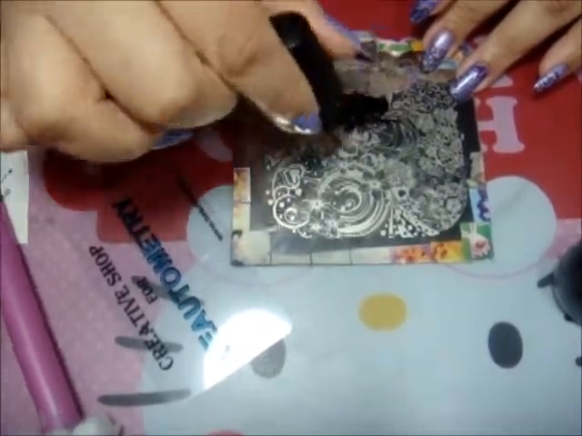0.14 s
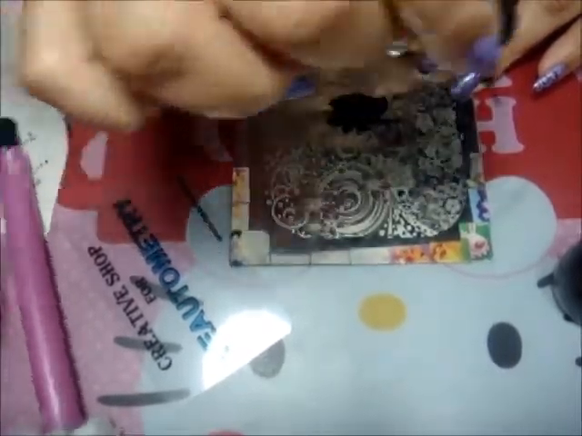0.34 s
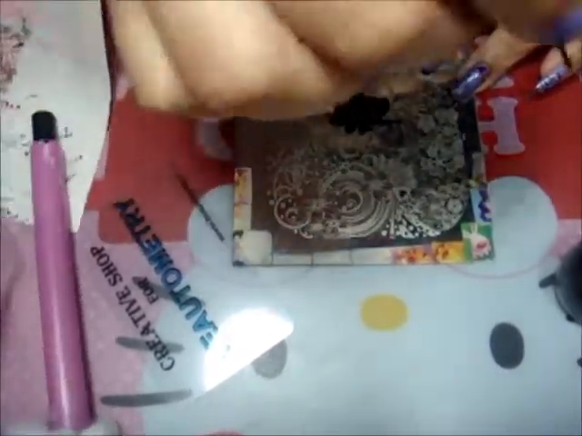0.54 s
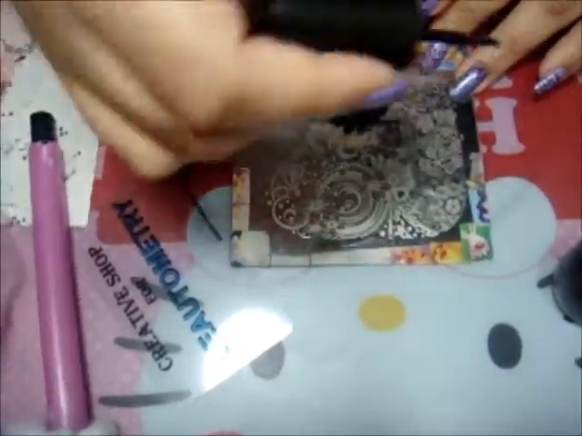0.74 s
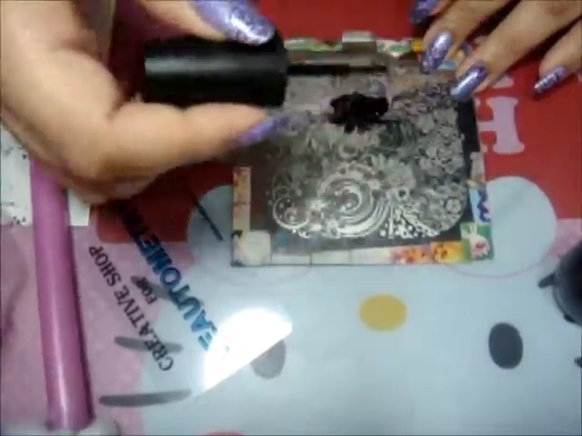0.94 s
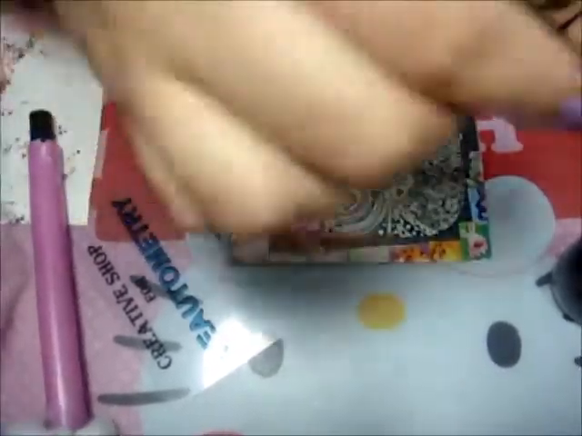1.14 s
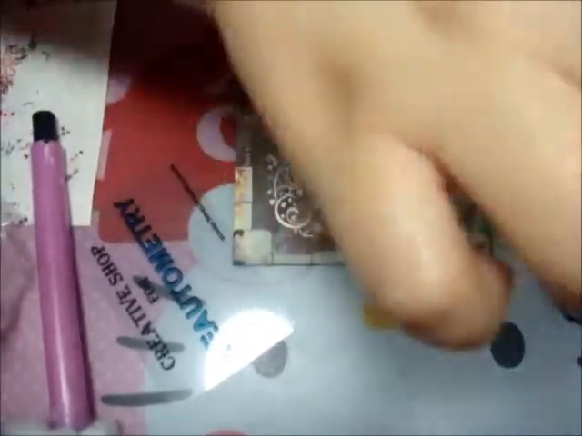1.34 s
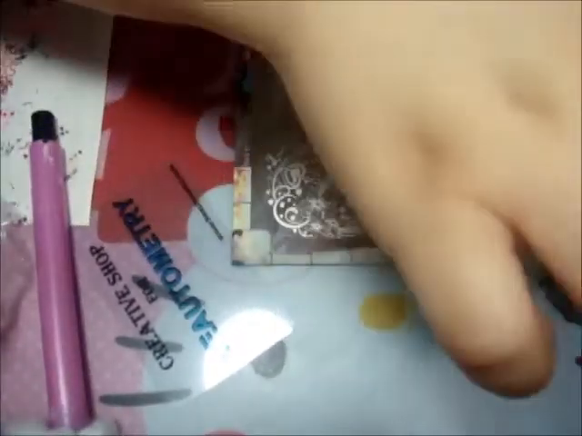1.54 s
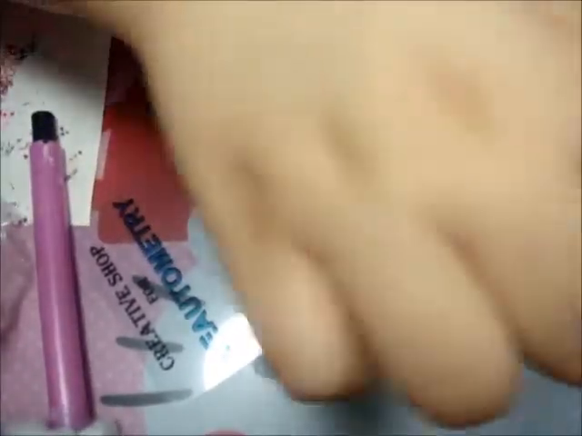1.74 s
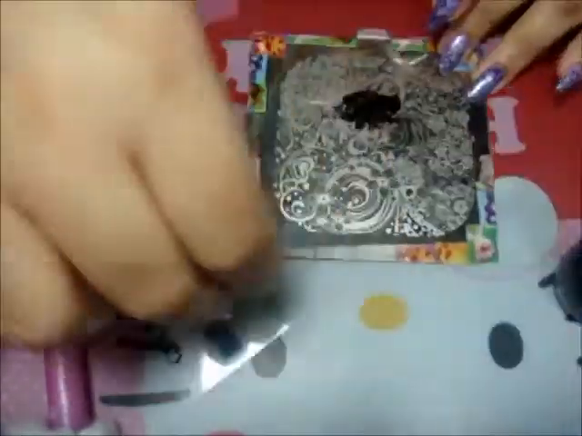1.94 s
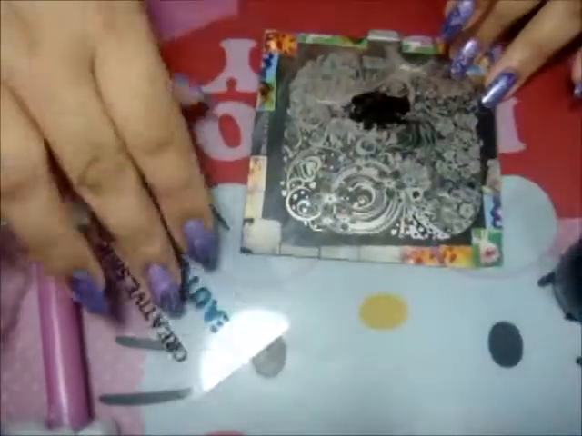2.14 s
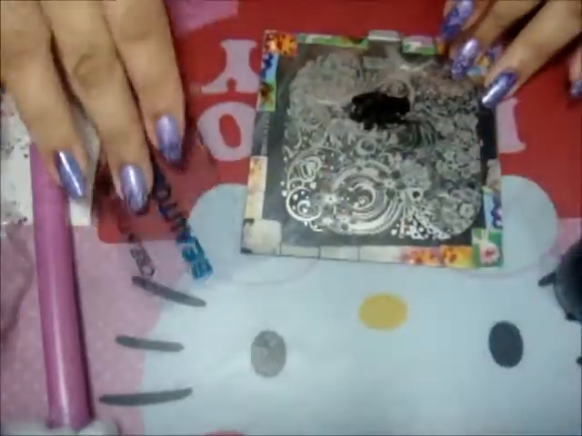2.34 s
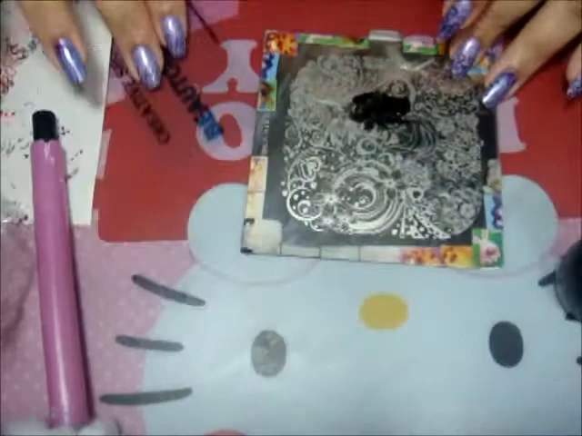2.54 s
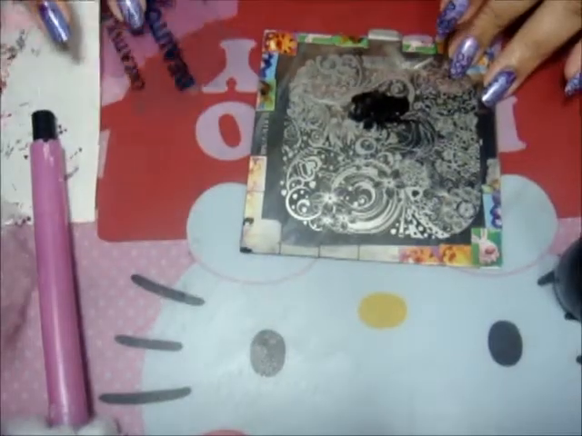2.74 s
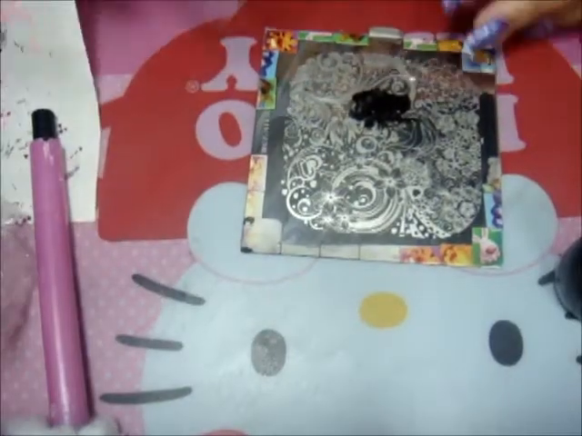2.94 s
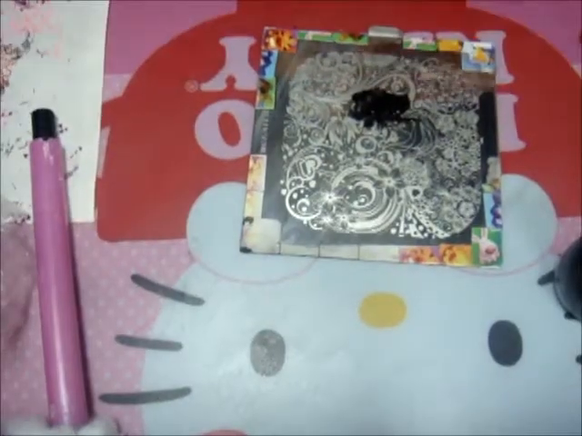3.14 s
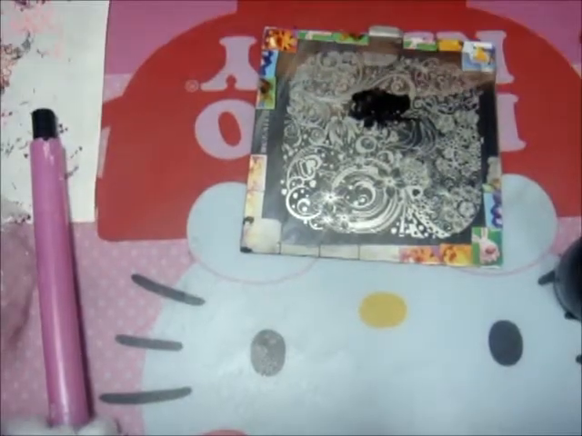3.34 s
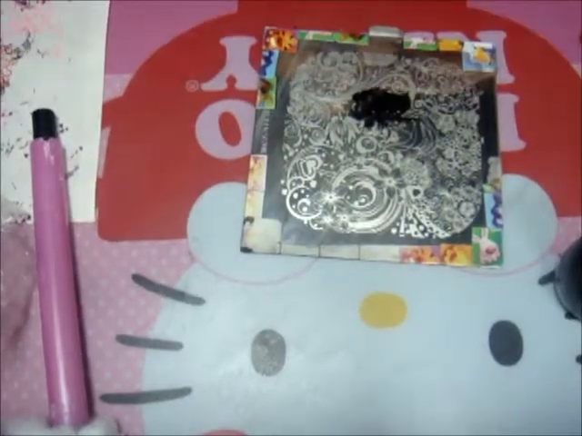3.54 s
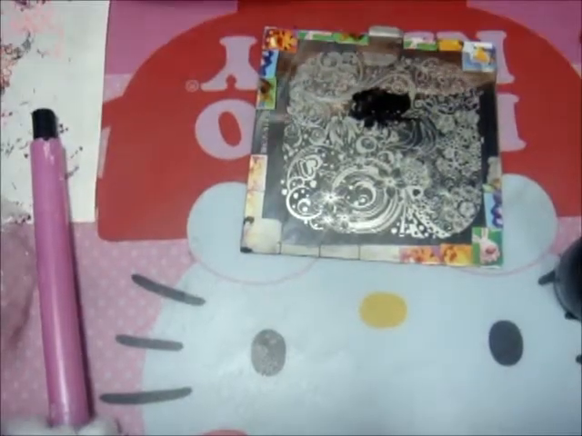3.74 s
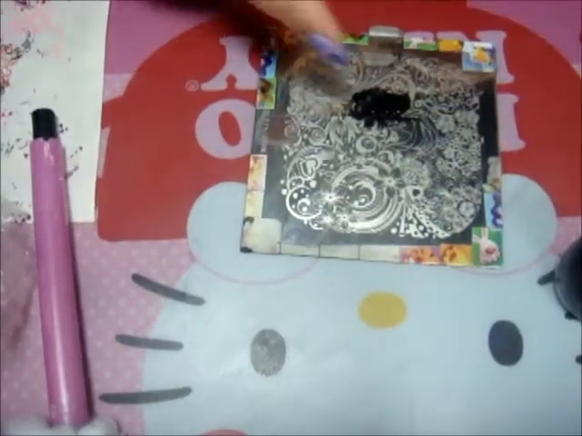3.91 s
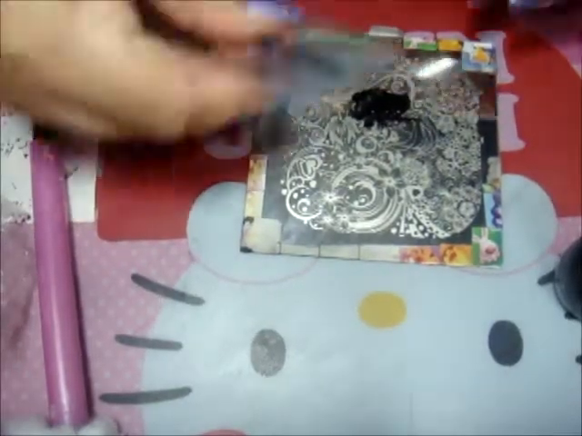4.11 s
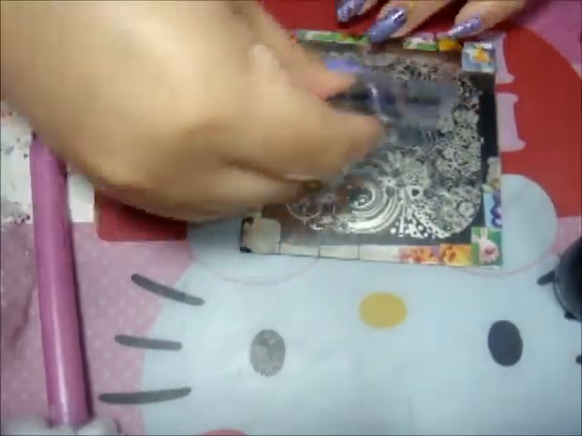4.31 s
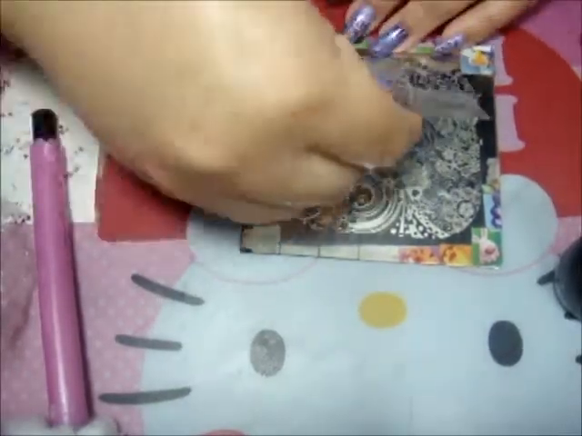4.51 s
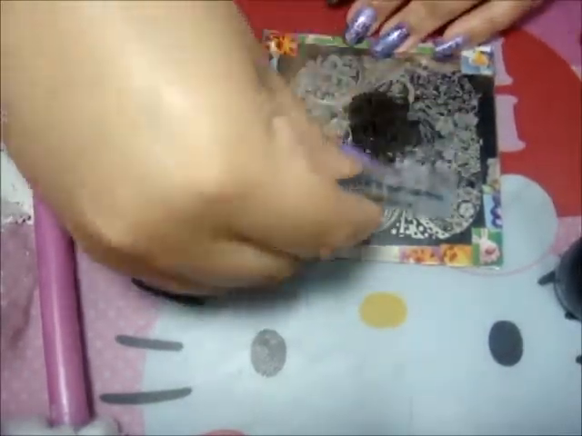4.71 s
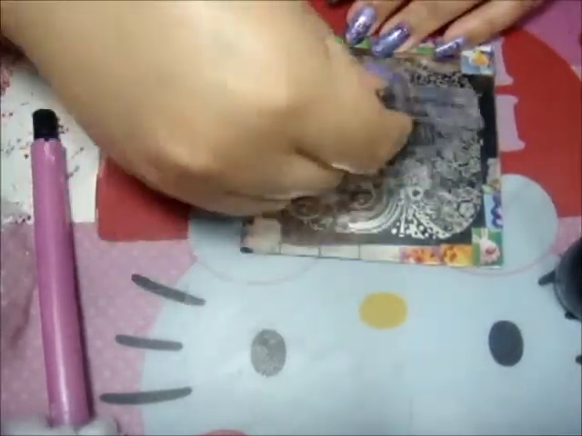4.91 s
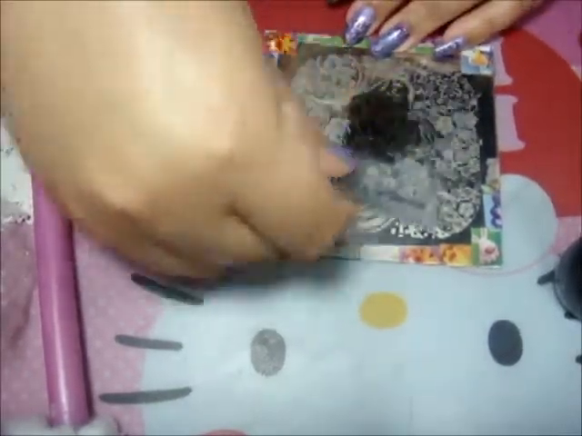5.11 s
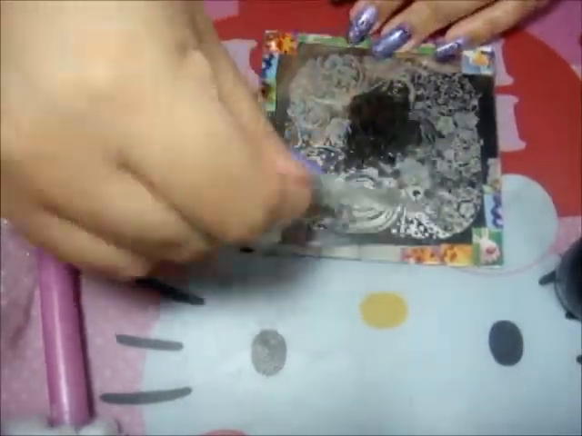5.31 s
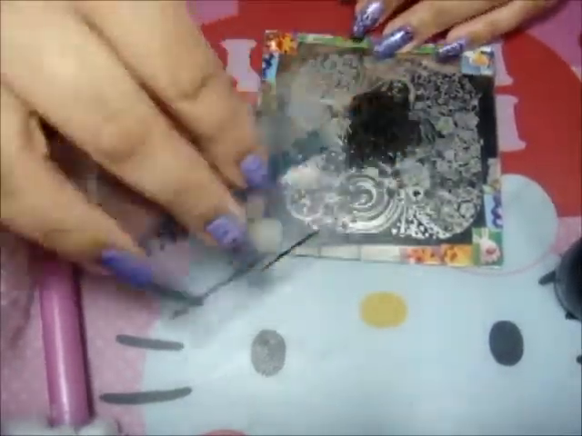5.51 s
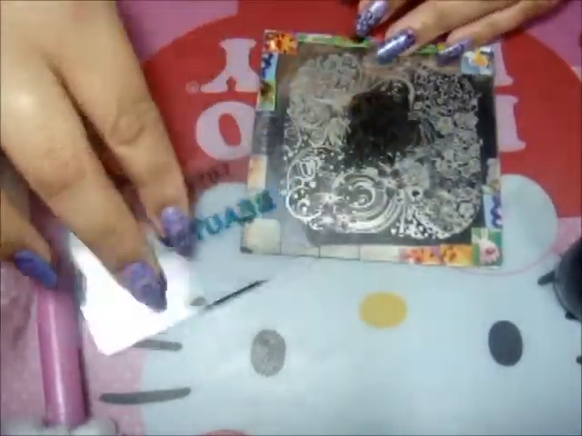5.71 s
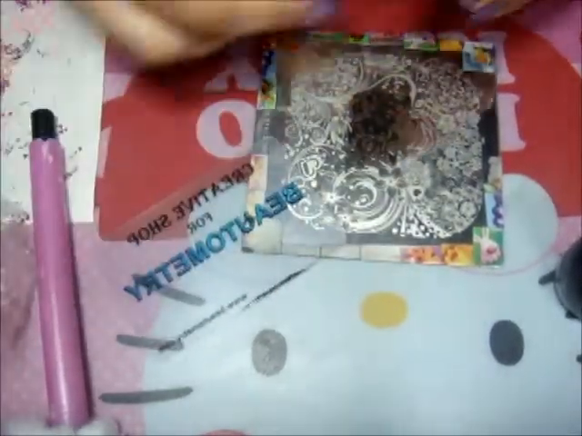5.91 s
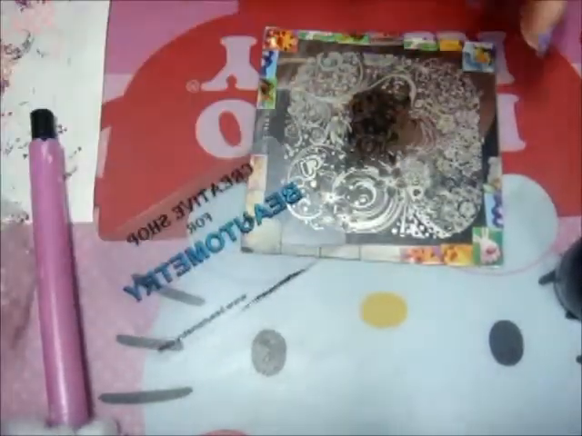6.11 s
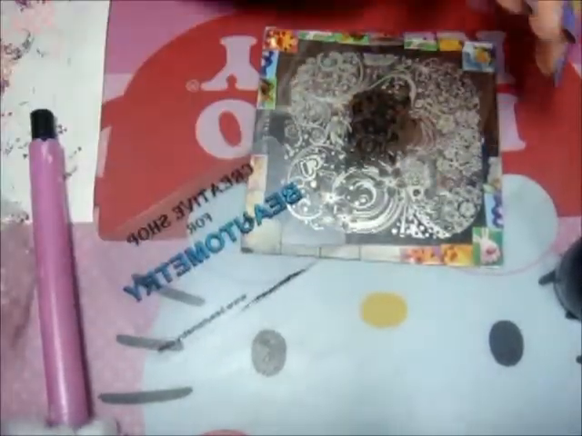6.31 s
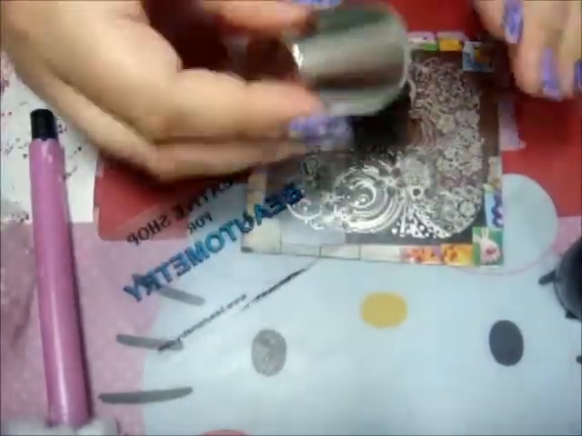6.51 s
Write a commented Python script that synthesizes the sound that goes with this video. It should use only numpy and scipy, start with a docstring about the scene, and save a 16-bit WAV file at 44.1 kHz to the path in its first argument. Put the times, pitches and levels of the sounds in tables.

```python
"""Hands at a table in a quiet room, heard close, over air, hiss, a wavering hum and faint whistles.
First a polish brush ticks on an etched metal plate, and its bottle knocks the table at 1.6 s: short rattles
and soft blows ring modes. From 2.2 s a thin plastic card slides long over the mat: a dense hail of impacts.
From 3.5 s its edge taps, then scrapes the plate at 4.5, 5.0 and, briefly, 5.6 s, catching on the etching
in the first two strokes. A last tap rings the metal at 5.8 s; a small slide follows, then the room remains."""
import sys
import numpy as np
from scipy import signal
from scipy.fft import rfft, irfft, next_fast_len
from scipy.io import wavfile
from scipy.ndimage import uniform_filter1d

SR = 44100
rng = np.random.default_rng(int(sys.argv[2]) if len(sys.argv) > 2 else 0)


def file_out(sig):
    """Save sig as 16-bit WAV at sys.argv[1]."""
    # one column per channel
    cols = np.atleast_2d(sig).T
    # limit, then scale
    lim = np.clip(cols, -1, 1)
    pcm = np.round(lim * 32767).astype(np.int16)
    wavfile.write(sys.argv[1], SR, pcm)


N = 289340  # samples

# In the tables of contacts and friction, shares are relative to the middle band or to the object's own ring.
# Brush and nail ticks:
# (time [s], level [dB], strongest tone [Hz], treble share [dB], rattle t60 [s])
BRUSH_TICKS = [(0.0263, -35.5, 1800, -4, 0.069), (0.0679, -24.5, 5480, -0.5, 0.035),
               (0.1782, -43, 4070, 4.5, 0.016), (0.21, -52, 2050, 16, 0.011), (0.278, -37, 2100, 8, 0.012),
               (0.3053, -27.5, 3970, 3.5, .051), (0.3562, -33, 3660, 8.5, 0.027),
               (0.4106, -30.5, 2360, -28, 0.066), (0.4183, -16.5, 3940, -3.5, 0.022),
               (0.5931, -33.5, 1840, -6, 0.036), (0.6419, -28.5, 3440, 8, 0.025),
               (0.7154, -33, 3280, -2, 0.022), (0.749, -38, 4290, 0.5, .026),
               (0.804, -30, 3000, 2.5, 0.038), (0.9441, -33, 2770, 5, 0.045),
               (1.1208, -31, 4060, 4.5, 0.032), (1.3556, -39, 1850, 1.5, 0.042),
               (1.4048, -28, 4260, 7, 0.031), (1.612, -18, 4120, -11, 0.019),
               (1.7166, -28.5, 3250, 3.5, .033), (1.9116, -37, 3270, 1.5, 0.046),
               (1.9709, -33, 4240, 2, 0.036), (2.0776, -37, 3080, -3, 0.078),
               (2.835, -32.5, 2070, 4.5, 0.064)]
# Dull blows of the bottle on the table: (time [s], level [dB])
BOTTLE_KNOCKS = [(1.606, -25), (1.613, -17.5), (1.625, -27), (1.64, -19), (1.644, -25), (1.65, -24),
                 (1.654, -26), (1.668, -38)]
# The long slide of the card over the mat:
# (time [s], level [dB], treble share [dB], low share [dB])
LONG_SLIDE_PATH = [(2.165, -79, -7, 8), (2.173, -49, -27, -24), (2.189, -47, 4.5, -8.5),
                   (2.283, -37, 2, -11.5), (2.353, -31.5, -6, -12), (2.375, -36.5, -1.5, -12.5),
                   (2.427, -32.5, -1.5, -13), (2.605, -36.5, -8, -17), (2.63, -44.5, -3, -23)]
# Short slides over the mat:
# (start [s], length [s], crest place [share of length, 0-1], crest level [dB], treble share [dB])
SHORT_SLIDES = [(0.18, 0.16, 1, -55, -20), (0.289, 0.11, 1, -46, 1.5), (0.406, 0.07, 0.57, -51.5, -4.5),
                (0.569, 0.11, 0.8, -51.5, -29), (1.897, 0.079, 0.53, -42.5, -7.5),
                (2.612, 0.11, 0.67, -47, -2.5), (2.751, 0.065, 0.95, -48.5, -10),
                (2.808, 0.05, .7, -41.5, -2.5), (2.865, 0.085, 0.74, -49, -2), (2.955, 0.34, 0.16, -62, -6),
                (3.572, 0.055, .4, -57.5, -1.5), (5.282, 0.15, 0.94, -61.5, 0),
                (6.092, 0.23, 0.4, -70.5, 10)]
# The card is handled and its edge taps the plate or mat:
# (time [s], level [dB], strongest tone [Hz], treble share [dB], rattle t60 [s], low share [dB])
CARD_TAPS = [(3.5467, -25.5, 2680, -4.5, 0.019, -19), (3.667, -41.5, 2680, 2.5, .021, -12),
             (3.8803, -28.5, 3020, -4, 0.019, -8), (3.91, -39, 1690, -6, 0.023, -4),
             (3.9485, -38, 2860, 7, 0.032, -11), (3.9622, -31.5, 1580, -29, 0.011, -12),
             (4.2003, -27, 2430, -3.5, 0.022, -19), (4.2496, -39.5, 2860, -4, 0.035, -25),
             (4.4548, -19, 2600, -7.5, 0.014, -8.5), (4.5097, -35.5, 2880, -26, 0.018, -16),
             (4.9497, -24, 2950, -14, 0.019, -10.5), (4.9861, -24.5, 3100, -10, 0.02, -31),
             (4.9905, -24, 2980, -10, 0.017, -12.5), (5.011, -42, 2500, -27, 0.011, -3),
             (5.1607, -30, 4370, -18, 0.0057, -24), (5.1746, -38.5, 1770, 7, 0.012, -10),
             (5.341, -40, 5100, 5, 0.014, -11), (5.5671, -22.5, 2100, -9, 0.028, -15),
             (5.6037, -35, 2500, -11, 0.05, -28), (5.6415, -28, 2800, -7, .025, -21),
             (5.6455, -14.5, 2720, -17, 0.018, -17), (5.656, -22.5, 2780, -26, 0.016, -18),
             (5.7205, -20.5, 2840, -0.5, 0.021, -19), (5.752, -32.5, 2130, -2, .017, -14),
             (5.7806, -24.5, 3020, 0, 0.041, -17), (5.7896, -20, 4200, -3.5, 0.025, -19)]
# Strokes over the plate, one table each:
# (time [s], level [dB], treble share [dB], low share [dB])
PLATE_STROKES = [
    [(4.5, -53, -17, -6), (4.545, -53, -3, 2.5), (4.553, -33, -10.5, -15), (4.6, -34, -8, -11),
     (4.635, -46.5, -3, -12), (4.685, -47.5, -22, 6.5), (4.7, -81, -14, -5)],
    [(5.012, -53, -17, -5), (5.024, -41.5, -22, -10), (5.09, -40.5, -4.5, -11.5), (5.145, -41, -2, -1),
     (5.16, -62, -20, 3), (5.19, -54, -16, -4)],
    [(5.6, -49, -16, -12), (5.635, -64, -28, 4), (5.65, -31, -2, -3), (5.675, -59, -33, 7)],
]
# During a stroke the edge catches on ridges of the etching:
# (time [s], level [dB], treble share [dB], rattle t60 [s])
RIDGE_CATCHES = [(4.5496, -8.5, -21, 0.0099), (4.5561, -14.5, -11, 0.025), (4.5652, -16, -19, 0.034),
                 (4.585, -22.5, 4.5, 0.04), (4.5879, -20.5, -0.5, 0.017), (4.6118, -20, -21, 0.014),
                 (4.622, -23.5, -21, .016), (4.631, -21.5, -3.5, 0.015), (4.64, -23.5, -2.5, .012),
                 (4.6574, -32.5, 10, 0.021), (4.662, -25, 0, 0.016), (4.6763, -22, -9, .014),
                 (5.018, -19, -0.5, 0.027), (5.0234, -22.5, 2, 0.028), (5.029, -24, -13, 0.021),
                 (5.0432, -16.5, -24, 0.015), (5.0478, -21, -28, 0.018), (5.0556, -18, -1.5, 0.046),
                 (5.07, -27, 0, 0.04), (5.0834, -31, -1, 0.031), (5.1108, -27, 3, .026),
                 (5.124, -25.5, -3, 0.012), (5.1308, -27, 0, 0.027), (5.1414, -22, -6.5, 0.023),
                 (5.147, -24.5, -8, 0.018)]
# The plate is pushed and the table gives: (time [s], level [dB], time constant [s])
TABLE_PUSHES = [(4.549, -63, 0.0032), (5.02, -33, 0.00089), (5.141, -50, 0.0021)]
# The card's last tap rings the metal: (time [s], tone [Hz], level [dB], t60 [s])
LAST_TAP_PING = (5.79, 5170, -41, .14)

# Resonances of the brush: (tone [Hz], width [Hz], level [dB])
BRUSH_MODES = [(1960, 540, -2.5), (2974, 890, -1), (3660, 240, 1), (4300, 99, 1.5)]
# Resonances of the card: (tone [Hz], width [Hz], level [dB])
CARD_MODES = [(1853, 1400, -3.5), (2167, 67, 11.5), (2790, 740, 3), (3050, 294, 16.5), (3080, 700, 9),
              (4240, 970, 3.5)]
# Bright ring of the metal, before the chance of each spot: (tone [Hz], width [Hz], level [dB])
METAL_MODES = [(4700, 1400, -0.5), (6840, 880, 3), (8230, 1570, -2), (9800, 680, -5.5)]
# Low modes of the plate lying on the mat: (tone [Hz], width [Hz], level [dB])
PLATE_MODES = [(497, 157, 3), (857, 197, -0.5), (1093, 57, 5), (1510, 120, -26)]
# Low modes of the table: (tone [Hz], width [Hz], level [dB])
TABLE_MODES = [(273, 53, 4), (360, 33, 13), (419, 170, 7.5), (640, 42, 7.5), (842, 55, 5), (1040, 140, -30)]
# Relative colour of a slide over the mat: (frequency [Hz], level [dB])
MAT_COLOUR = [(290, -48), (500, -15), (574, -22.5), (959, -17.5), (1070, -12.5), (1490, -11), (1670, -9),
              (2060, 0), (2750, 1.5), (3240, -1.5), (3530, 2), (3860, -3), (4160, -0.5), (6700, -3),
              (10000, -8.5), (13000, -83.5), (22000, -120)]

# Faint whistles, perhaps a bird outdoors: (time [s], length [s], start [Hz], end [Hz], level [dB])
FAINT_WHISTLES = [(0.081, 0.067, 2660, 2540, -57), (.47, 0.086, 3150, 3150, -63),
                  (4.715, .07, 2600, 2660, -65), (4.784, 0.08, 2660, 2790, -61),
                  (5.188, 0.15, 2650, 3050, -61.5), (5.42, 0.043, 3180, 3300, -73),
                  (5.46, 0.065, 3600, 3600, -63), (5.88, .08, 3140, 3120, -64),
                  (5.918, 0.12, 2630, 2520, -60)]
# A passing low rumble: (time [s], level [dB])
RUMBLE_LEVEL = [(2.4, -88), (2.61, -60), (3.35, -69.5), (3.6, -85)]
# A low hum, before its waver: (time [s], level [dB])
HUM_LEVEL = [(0.0, -62), (0.24, -57), (0.29, -70), (0.35, -80), (0.46, -61), (0.77, -76.5), (2.41, -64),
             (4.46, -80.5), (4.64, -64), (4.73, -73), (5.04, -64.5), (6.32, -77), (6.56, -69)]
# Relative colour of the room air and microphone hiss: (frequency [Hz], level [dB])
ROOM_COLOUR = [(12, -60), (20, -14.5), (133, -5.5), (230, -1), (262, 0), (332, -2), (398, -0.5),
               (1500, -6.5), (2160, -8.5), (2590, -7.5), (3360, -10.5), (3630, -13), (10000, -18.5),
               (13000, -68), (22000, -120)]
# Course of the room air, before a fixed lift and slow drift: (time [s], level [dB])
ROOM_LEVEL = [(0.0, -59), (0.3, -55.5), (1.1, -59), (2.0, -58.5), (2.3, -56.5), (3.4, -59), (6.56, -59)]

CATCH_HZ = 2860  # the bent card's main tone
TICK_LOW_DB, CATCH_LOW_DB = -14.5, -20.5  # share of the plate's low modes
SPOT_DB = 2.0  # each contact lands on another spot and wakes the metal's modes unevenly
SET_OFF_S, STOP_S = 0.01, 0.012  # how fast friction starts and stops
STILL_DB = -42  # level at rest, relative to the slide's end levels
FIRST_DB, LAST_DB = -6.5, -6  # a short slide's start and end, relative to its crest
SLIDE_LOW_DB = -8  # a short slide's low share
LIFT_S, LIFT_LENGTH_S = 2.548, 0.064  # the card starts to lift off; how long it takes
LIFT_HZ, LIFT_SHARE = 3250, 0.88  # the slide loses this share under LIFT_HZ
HUM_HZ, HUM_WIDTH_HZ, HUM_WAVER_DB = 148.2, 13, 2.5
CUT_HZ = 10180  # the recorder's upper band limit


def amp(db):
    """Decibels to amplitude."""
    return 10 ** (np.asarray(db) / 20)


def unit(x):
    """Scales a signal to rms 1."""
    return x / np.sqrt(np.mean(x ** 2) + 1e-20)


def add(mix, s, sound):
    """Lays a sound into the mix at s seconds, cut at the end."""
    part = mix[round(s * SR):][:len(sound)]
    part += sound[:len(part)]


def noise():
    """White noise as long as the scene."""
    return rng.standard_normal(N)


def course(rows, **outside):
    """Level in decibels over the whole scene, drawn straight between (time, level) rows."""
    return np.interp(np.arange(N) / SR, *np.transpose(rows), **outside)


def ring(x, hz, width):
    """One resonance: a decaying complex pole with gain 1 at its tone."""
    r = np.exp(-np.pi * width / SR)
    return 2 * signal.lfilter([1 - r], [1, -r * np.exp(2j * np.pi * hz / SR)], x).real


def body(x, modes):
    """The sum of an object's resonances, with alternating signs."""
    return sum((-1) ** k * amp(db) * ring(x, hz, width) for k, (hz, width, db) in enumerate(modes))


def spot(modes):
    """The same modes, each louder or softer by chance."""
    chance = rng.standard_normal(len(modes))
    return [(hz, width, db + SPOT_DB * z) for (hz, width, db), z in zip(modes, chance)]


def coloured(x, points):
    """Shapes a signal by a spectrum drawn on a log-frequency axis, at rms 1."""
    hz, db = np.transpose(points)
    size = next_fast_len(len(x))
    bins_hz = np.fft.rfftfreq(size, 1 / SR)
    gain = amp(np.interp(np.log(bins_hz + 1), np.log(hz + 1), db))
    return unit(irfft(rfft(x, size) * gain, size)[:len(x)])


def mat_colour(x):
    """The colour of friction on the mat."""
    return coloured(x, MAT_COLOUR)


def wobble(size, s):
    """Slow chance of rms 1 that changes within about s seconds."""
    span = max(int(s * SR), 2)
    return unit(uniform_filter1d(uniform_filter1d(rng.standard_normal(size), span), span))


def taps(rows, modes, rise, tone_db, width, click_db):
    """A short rattle rings the object, the metal and the plate; a click joins in the first two."""
    out, t = np.zeros(N), np.arange(3000) / SR
    crest = int(rise * SR)
    for s, db, hz, treble_db, t60, low_db in rows:
        swell = np.minimum(t / rise, 1) ** 2
        decay = amp(-60 * np.maximum(t - rise, 0) / max(t60, 0.004))
        rattle, metal_rattle, plate_rattle = rng.standard_normal((3, len(t))) * swell * decay
        rattle[crest] += amp(click_db)  # the edge lets go at the crest of the swell
        metal_rattle[crest] += amp(click_db - 10)
        middle = unit(body(rattle, modes)) + amp(tone_db) * unit(ring(rattle, hz, width))
        treble = body(metal_rattle, spot(METAL_MODES))
        low = body(plate_rattle, PLATE_MODES)
        for part, share_db in ((middle, 0), (treble, treble_db), (low, low_db)):
            peak = np.abs(signal.hilbert(part)).max()
            add(out, s - rise / 2, amp(db + share_db) * part / peak)
    return out


def brush_ticks():
    """The brush and nails rattle on the plate for an instant and ring the brush's modes."""
    rows = [(*row, TICK_LOW_DB) for row in BRUSH_TICKS]
    return taps(rows, BRUSH_MODES, rise=0.0018, tone_db=0.0, width=290, click_db=10)


def bottle_knocks():
    """Soft blows of about a millisecond push the table and ring its low modes."""
    out, t = np.zeros(N), np.arange(2500) / SR
    centre_s = 0.002
    blow = np.exp(-0.5 * ((t - centre_s) / 0.00024) ** 2)
    ringing = body(np.gradient(blow), TABLE_MODES)
    push = blow - uniform_filter1d(blow, size=88)
    thud = 0.56 * ringing / abs(ringing).max() - 0.42 * push
    for s, db in BOTTLE_KNOCKS:
        add(out, s - centre_s, amp(db) * thud)
    return out


def rubs(tables, colour, grit_db, per_s, clump_db, patchy_db):
    """Friction: a dense hail of tiny impacts of uneven size, its colour shifting in random patches."""
    out = np.zeros(N)
    for rows in tables:
        s, db, treble_db, low_db = np.transpose(rows)
        t = np.arange(s[0], s[-1], 1 / SR)
        size = amp(grit_db * np.minimum(rng.exponential(1, len(t)), 4))
        impacts = size * (rng.random(len(t)) < per_s / SR)
        hail = rng.standard_normal(len(t)) * (0.18 + impacts)  # a fine hiss lies under the impacts
        clumped = hail * amp(clump_db * wobble(len(t), 0.0023))
        z = signal.stft(colour(clumped), nperseg=256, noverlap=192)[2]
        patches = uniform_filter1d(rng.standard_normal(z.shape), 4, 0)  # across frequency
        patches = unit(uniform_filter1d(patches, 6, 1))  # across time
        patchy = signal.istft(z * amp(patchy_db * patches), nperseg=256, noverlap=192)[1][:len(t)]
        sound = 0
        bands = (((500, 1800), low_db), ((1800, 5000), 0 * db), ((5000, 12000), treble_db))  # Hz, dB
        for band, share_db in bands:
            sos = signal.butter(3, band, "band", fs=SR, output="sos")
            part = unit(signal.sosfiltfilt(sos, patchy))
            sound = sound + part * amp(np.interp(t, s, db + share_db))
        fade = signal.windows.tukey(len(t), min(0.013 / (s[-1] - s[0]), 1))
        add(out, s[0], sound * fade)
    return out


def long_slide():
    """A smooth, dense slide that thins from below as the card lifts off the mat."""
    x = rubs([LONG_SLIDE_PATH], mat_colour, grit_db=-0.3, per_s=30000, clump_db=0.6, patchy_db=2.0)
    low = signal.sosfiltfilt(signal.butter(3, LIFT_HZ, fs=SR, output="sos"), x)
    lift = np.clip((np.arange(N) / SR - LIFT_S) / LIFT_LENGTH_S, 0, 1)
    return x - low * LIFT_SHARE * lift


def gesture(start, length, crest, db, treble_db):
    """One slide: sets off, swells to its crest, slows and stops."""
    crest_s = np.clip(crest * length, 1.2 * SET_OFF_S, length - 0.001)
    s = start + np.array([0, SET_OFF_S, crest_s, length, length + STOP_S])
    level = db + np.array([FIRST_DB + STILL_DB, FIRST_DB, 0, LAST_DB, LAST_DB + STILL_DB])
    return np.transpose([s, level, treble_db + 0 * s, SLIDE_LOW_DB + 0 * s])


def short_slides():
    """Brief friction on the mat, with sparser and more uneven impacts than the long slide."""
    paths = [gesture(*row) for row in SHORT_SLIDES]
    return rubs(paths, mat_colour, grit_db=3.5, per_s=7600, clump_db=-0.2, patchy_db=2.0)


def card_taps():
    """The card's edge rattles and clicks on the plate or mat and rings the card's modes."""
    return taps(CARD_TAPS, CARD_MODES, rise=0.0019, tone_db=4.5, width=290, click_db=16)


def stroke_colour(x):
    """The card's resonances with a little of the mat's colour."""
    return unit(body(x, CARD_MODES)) + 0.29 * mat_colour(x)


def plate_strokes():
    """The card scrapes the plate: sparse, uneven impacts in clumps; the colour shifts in random patches."""
    return rubs(PLATE_STROKES, stroke_colour, grit_db=4.0, per_s=3000, clump_db=1.5, patchy_db=4.5)


def ridge_catches():
    """The card's edge catches on ridges of the etching and rings at the bent card's main tone."""
    rows = [(s, db, CATCH_HZ, treble_db, t60, CATCH_LOW_DB) for s, db, treble_db, t60 in RIDGE_CATCHES]
    return taps(rows, CARD_MODES, rise=0.0019, tone_db=13.0, width=320, click_db=9)


def table_pushes():
    """A slow bump with no ring, which swings through zero once as it dies."""
    out = np.zeros(N)
    for s, db, time_constant in TABLE_PUSHES:
        u = np.arange(4000) / SR / time_constant
        add(out, s, amp(db) * u * (2 - u) * np.exp(-u) * 2)
    return out


def last_tap_ping():
    """A close group of thin metal modes beats and dies away."""
    out, t = np.zeros(N), np.arange(8000) / SR
    s, hz, db, t60 = LAST_TAP_PING
    beat = 0.6 + 0.4 * np.cos(2 * np.pi * 27 * t)
    add(out, s, amp(db - 60 * t / t60) * np.sin(2 * np.pi * hz * t) * beat)
    return out


def faint_whistles():
    """Thin gliding tones, their pitch and level wavering at random."""
    out = np.zeros(N)
    for s, length, start_hz, end_hz, db in FAINT_WHISTLES:
        glide = np.linspace(start_hz, end_hz, int(length * SR))
        size = len(glide)
        hz = glide * (1 + 0.0099 * wobble(size, 0.0048))
        tone = np.sin(2 * np.pi * np.cumsum(hz) / SR)
        flutter = 1 + 0.5 * wobble(size, 0.006)
        add(out, s, amp(db) * flutter * tone * signal.windows.tukey(size, 0.5))
    return out


def rumble():
    """Noise through a broad low resonance, twice, that swells and passes."""
    tone = unit(ring(ring(noise(), 275, 120), 275, 120))
    return tone * amp(course(RUMBLE_LEVEL, left=-120, right=-120))


def hum():
    """Noise through a narrow low resonance, twice, with a wavering level."""
    tone = unit(ring(ring(noise(), HUM_HZ, HUM_WIDTH_HZ), HUM_HZ, HUM_WIDTH_HZ))
    return tone * amp(course(HUM_LEVEL) + HUM_WAVER_DB * wobble(N, 0.16))


def room_air():
    """Steady air and microphone hiss: coloured noise, drifting a little."""
    lift_db, drift_db = 3, 0.9
    level = lift_db + course(ROOM_LEVEL) + drift_db * wobble(N, 0.04)
    return coloured(noise(), ROOM_COLOUR) * amp(level)


def scene():
    """The hands close by, over the whistles and the room, on one channel."""
    brush_and_bottle = brush_ticks() + bottle_knocks()
    slides = long_slide() + short_slides()
    card_on_plate = card_taps() + plate_strokes() + ridge_catches() + table_pushes() + last_tap_ping()
    background = faint_whistles() + rumble() + hum() + room_air()
    return (brush_and_bottle + slides + card_on_plate + background)[None]


def record(dry):
    """The band limit of the recorder: a steep linear-phase low-pass."""
    low_pass = signal.firwin(701, CUT_HZ, window=("kaiser", 9), fs=SR)
    return signal.oaconvolve(dry, low_pass[None], "same")


dry = scene()
out = record(dry)
file_out(out)
```